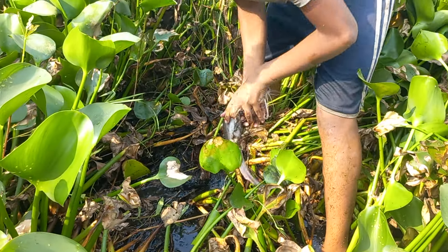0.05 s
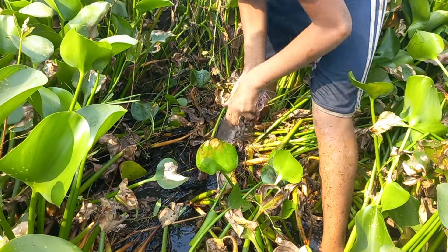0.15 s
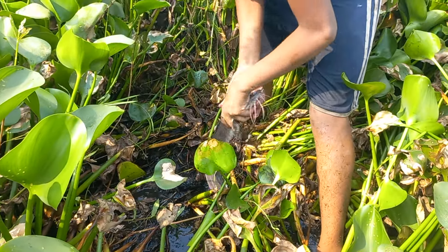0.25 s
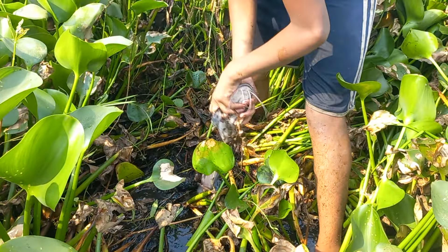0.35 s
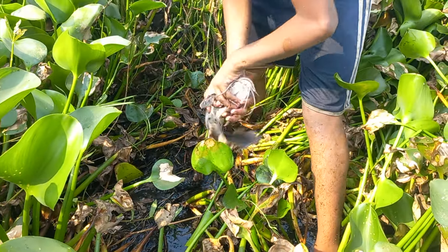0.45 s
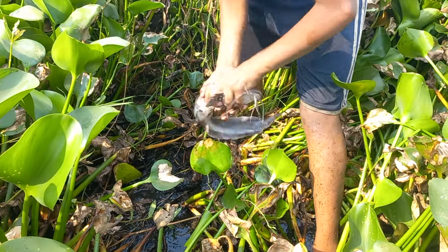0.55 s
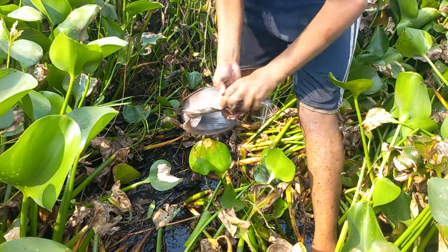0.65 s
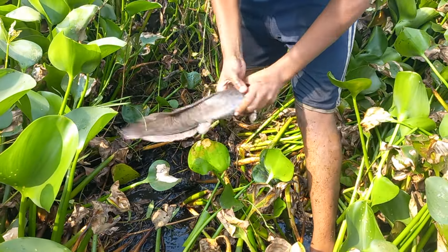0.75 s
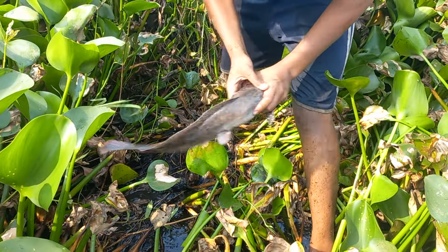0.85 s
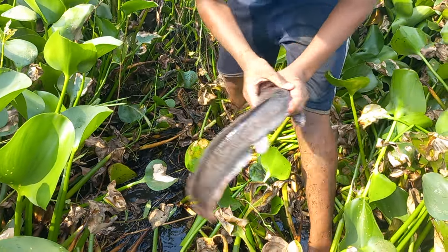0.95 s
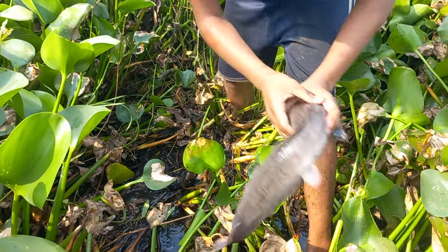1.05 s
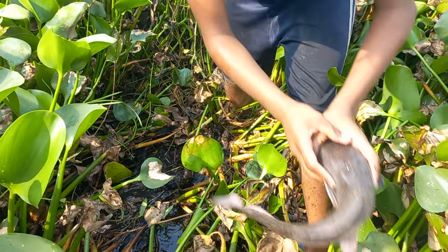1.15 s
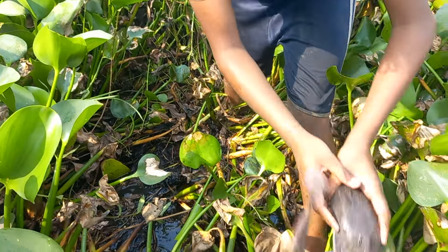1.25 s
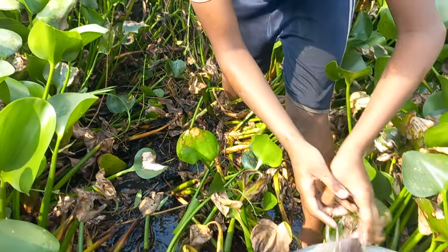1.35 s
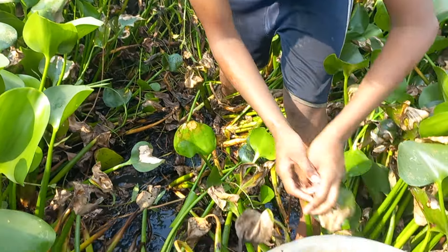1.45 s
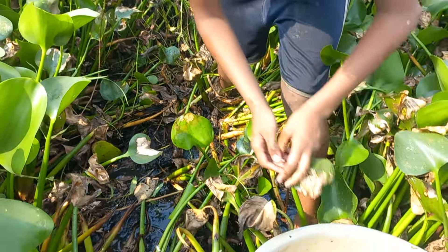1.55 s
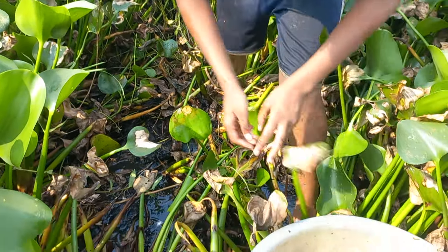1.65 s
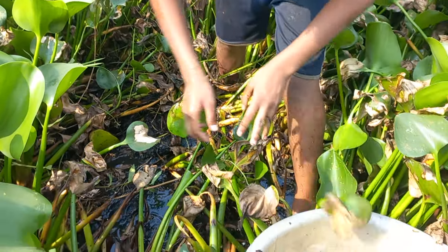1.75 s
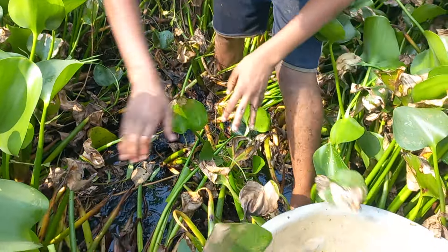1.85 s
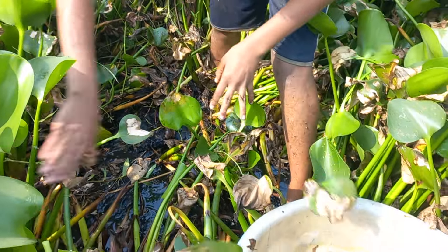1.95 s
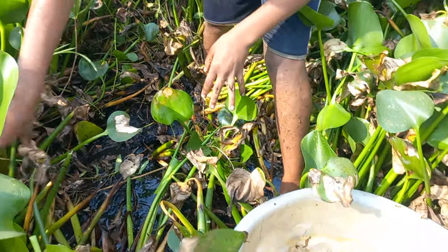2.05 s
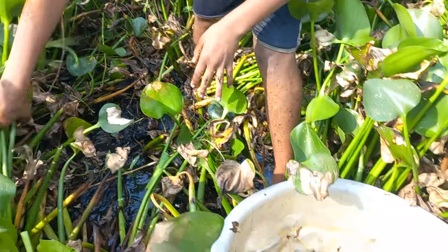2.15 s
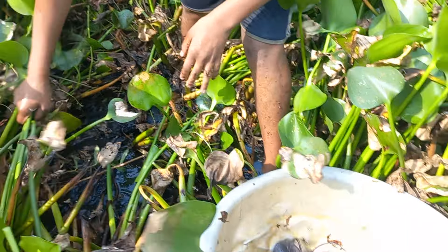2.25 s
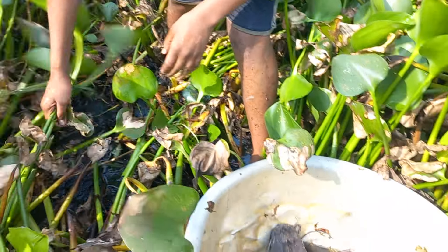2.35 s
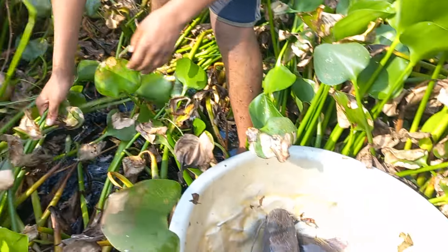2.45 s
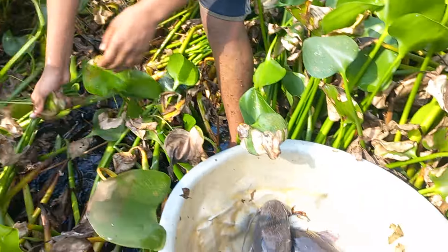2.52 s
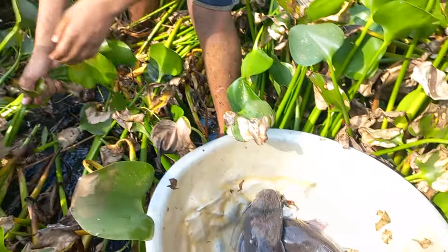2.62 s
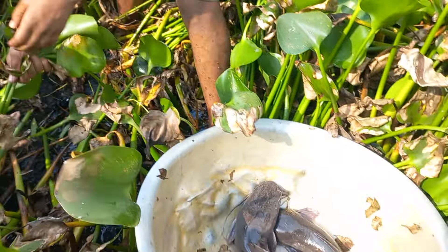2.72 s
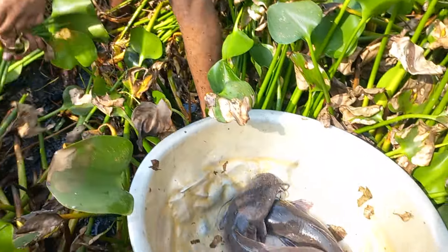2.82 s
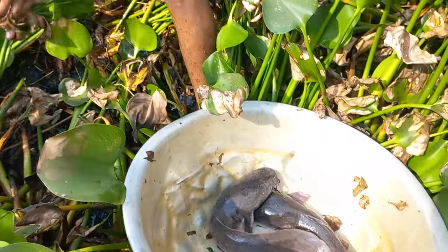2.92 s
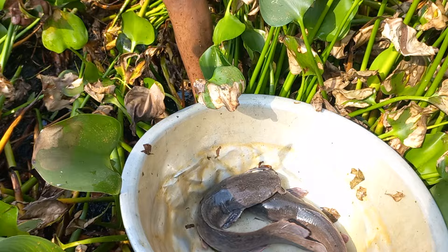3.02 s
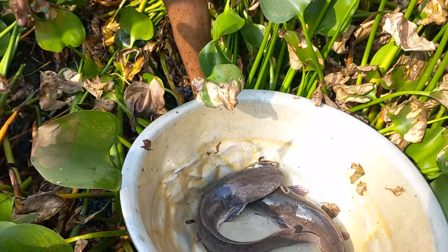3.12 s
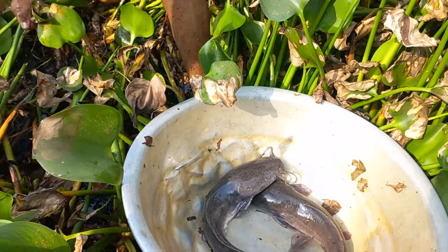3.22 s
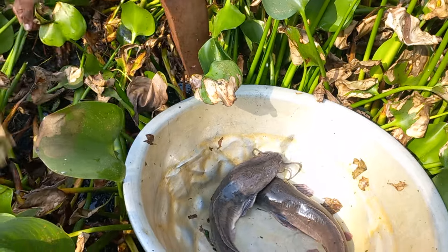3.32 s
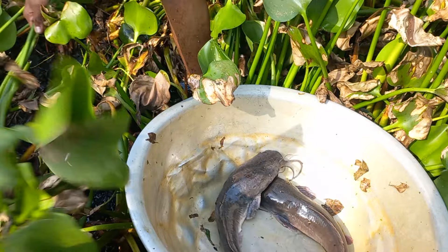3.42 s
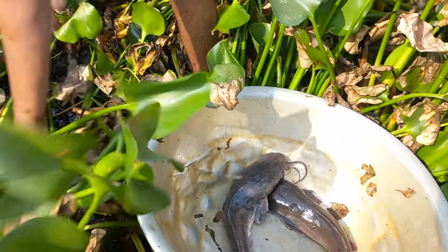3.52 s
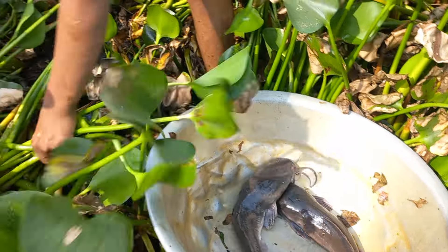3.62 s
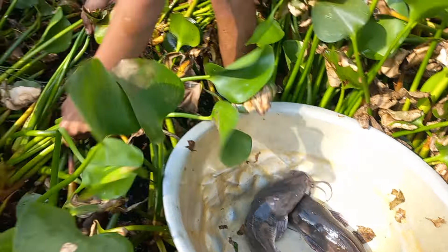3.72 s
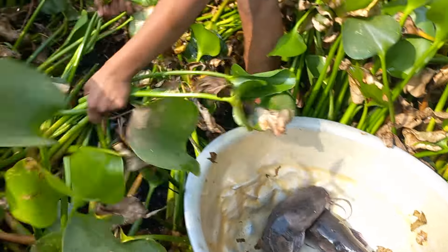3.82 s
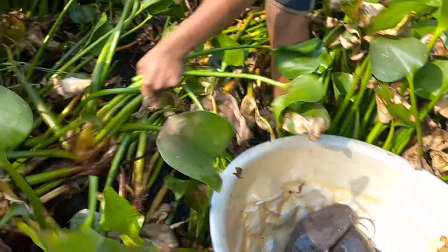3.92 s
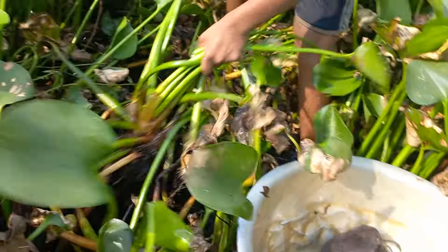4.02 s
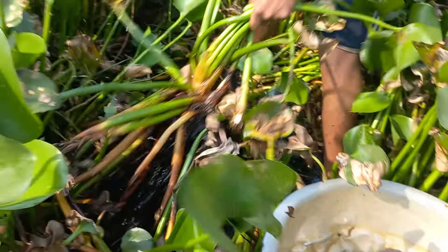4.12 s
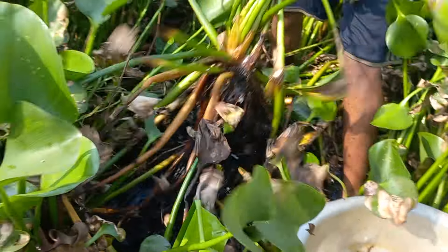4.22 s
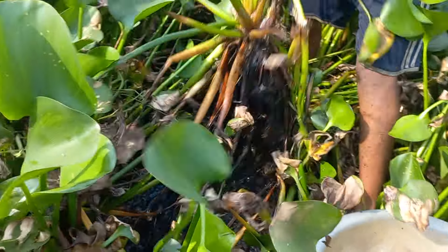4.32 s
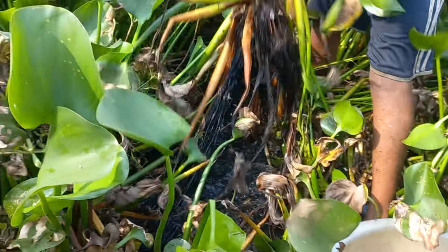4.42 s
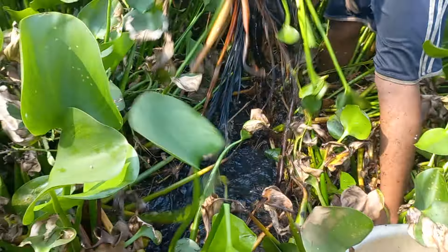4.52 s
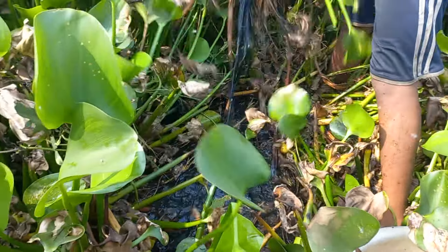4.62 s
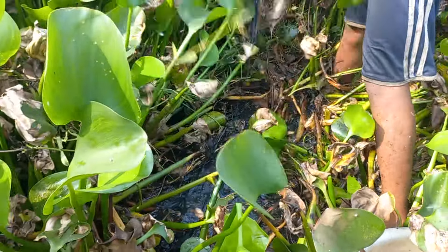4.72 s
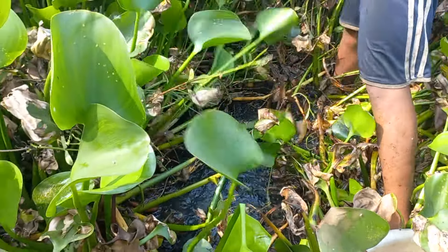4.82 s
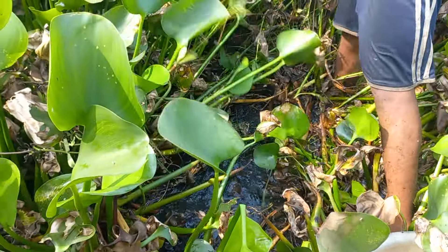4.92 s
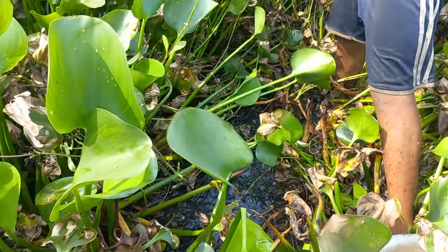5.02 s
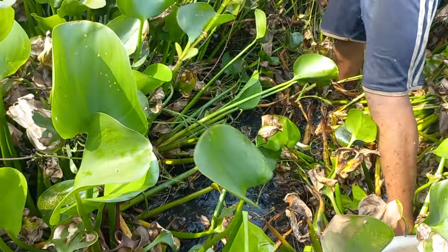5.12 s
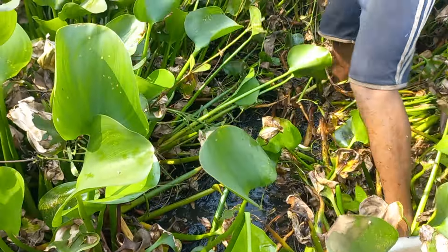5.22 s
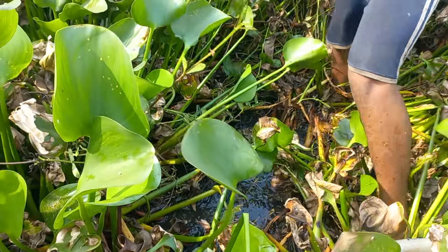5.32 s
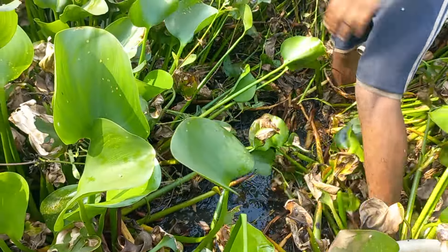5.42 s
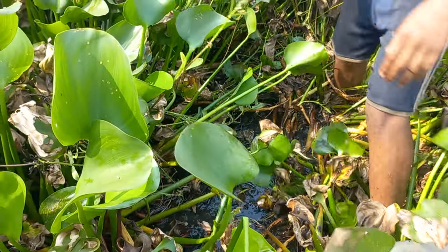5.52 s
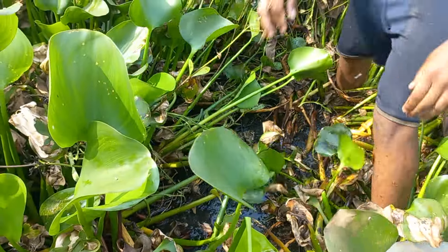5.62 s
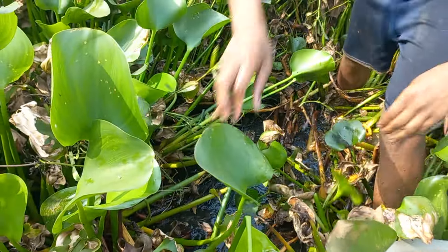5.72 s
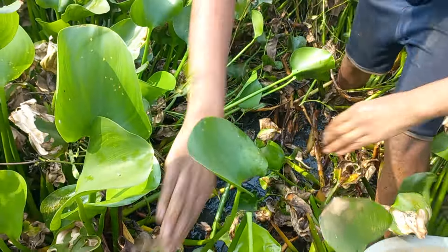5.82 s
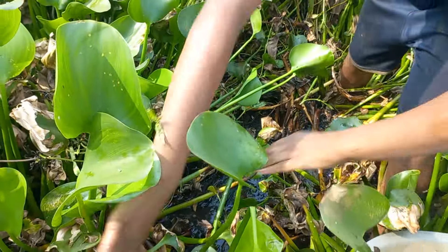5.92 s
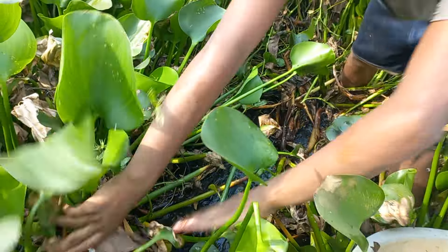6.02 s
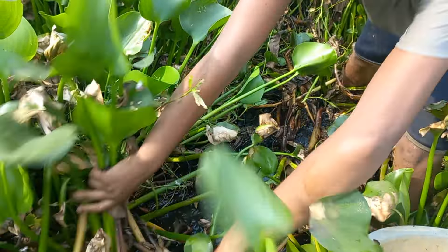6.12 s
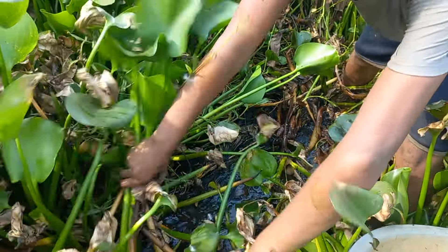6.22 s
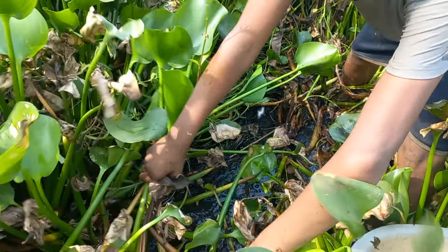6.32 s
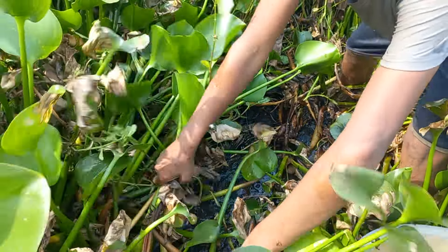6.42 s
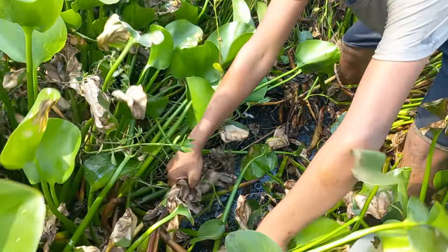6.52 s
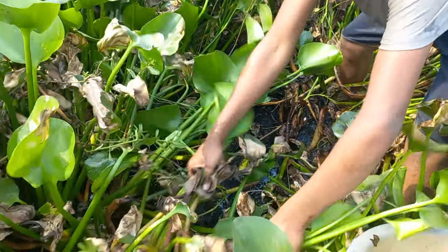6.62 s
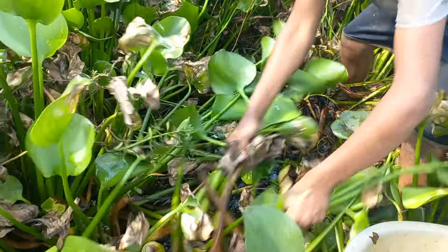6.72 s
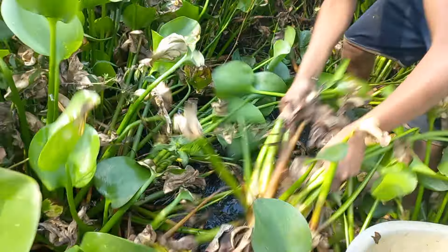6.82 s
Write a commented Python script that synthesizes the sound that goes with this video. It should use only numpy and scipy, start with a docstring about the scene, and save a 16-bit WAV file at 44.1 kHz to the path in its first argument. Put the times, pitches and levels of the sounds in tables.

```python
"""Wet plant stems rustle, crackle and snap as hands pull them out of shallow water.
Water trickles off the roots, bubbles pop, and a flapping fish drops into a thin basin,
setting it ringing and clattering. Birds twitter, pipe and call nearby, and far away a slow
single-cylinder engine thumps through its exhaust. Gusts buffet mainly the left microphone port."""
import sys
import numpy as np
from scipy import signal
from scipy.io import wavfile

SR = 44100
rng = np.random.default_rng(int(sys.argv[2]) if len(sys.argv) > 2 else 0)


def int16_out(signal):
    """Quantize to a 16-bit WAV file."""
    q = np.round(np.clip(np.atleast_2d(signal).T, -1, 1) * 32767)
    wavfile.write(sys.argv[1], SR, q.astype(np.int16))


N = 302614

# Handling the plants. Each row: time in seconds, then rustle, crisp band and wet low band levels in dB.
RUSTLE = [(0.0, -43, -62, -48), (0.19, -45.5, -69, -49.5), (0.67, -47, -66, -51), (1.2, -44, -67, -45.5),
          (1.45, -37.5, -49, -49), (1.57, -57, -67, -50), (1.7, -45, -67, -46.5), (1.83, -54, -72, -55.5),
          (2.06, -46, -62, -49.5), (2.27, -37, -54.5, -51), (2.41, -43, -56, -50.5),
          (2.56, -43.5, -60, -50.5), (2.75, -44.5, -53, -54), (2.94, -37, -42, -47),
          (3.15, -43, -56.5, -47), (3.36, -38.5, -49.5, -42.5), (3.44, -27.5, -33.5, -36),
          (3.57, -31, -34, -40), (4.11, -27.5, -33.5, -36.5), (4.7, -33.5, -40, -44.5),
          (4.99, -38.5, -47, -46.5), (5.31, -36, -46.5, -43), (5.66, -41.5, -52, -50),
          (5.96, -37.5, -46, -42.5), (6.27, -27.5, -31.5, -36.5), (6.51, -33, -40.5, -41),
          (6.69, -30.5, -35, -42.5), (6.86, -21.5, -28, -27.5)]
# Tone of the crackling stems. Each row: frequency in Hz, relative level per Hz in dB.
STEM_TONE = [(170, -3.5), (360, -4.5), (600, -6.5), (900, -7.5), (1470, -5), (1800, -5), (3100, -7.5),
             (4200, -7), (6000, -9.5), (7600, -15), (9500, -16), (12000, -14.5), (15000, -11.5)]
# Clear snaps. Each row: time in seconds, level in dB, strongest pitch in Hz, relative crisp part in dB,
# left over right in dB, 60 dB decay time in seconds, relative low part in dB.
SNAPS = [(0.135, -21.5, 2310, -14, 0, 0.039, -32), (0.1575, -14.5, 3800, -29, 1, 0.07, -38),
         (0.3476, -25, 2500, -20, -1.0, 0.042, -26), (0.387, -18, 3470, -17, -1.0, 0.045, -31),
         (0.6075, -28, 2900, -22, 2, 0.045, -16), (0.6305, -23, 4200, -23, 11, 0.045, -29),
         (0.8699, -10.5, 5400, -17, 10, 0.058, -45), (0.8745, -7, 4390, -27, -6, 0.041, -44),
         (1.3402, -24.5, 1400, -32, -3, 0.033, -9), (1.373, -20.5, 5580, -16, 5, 0.041, -26),
         (1.4006, -20.5, 1900, -20, -1, 0.045, -12), (1.419, -8.5, 1440, -1, 0.5, 0.045, -12),
         (1.4666, -1, 1410, -17, -2, 0.076, -29), (1.5144, 1, 1480, -15, 2, 0.028, -22.5),
         (1.5354, -3, 1760, -28, -2, 0.036, -30), (1.5773, -3, 1550, -23, 1, 0.045, -41),
         (1.7626, -32, 1410, -32, 0.0, 0.049, -6), (2.167, -17.5, 2140, -36, -1, 0.14, -18.5),
         (2.2044, -13.5, 2160, -31, -3, 0.036, -26), (2.3992, -14, 3620, -16.5, -2.5, 0.068, -31),
         (2.4238, -16.5, 2450, -16, 3, 0.039, -36), (2.492, -20, 2330, -24, -1.5, 0.072, -18.5),
         (2.5292, -20, 2580, -24, -8, 0.036, -34), (2.7147, -30, 2360, -15, -1.0, 0.045, -23),
         (2.7347, -27, 5890, -18, 0.5, 0.045, -16), (2.7726, -19.5, 3850, -1, 12, 0.053, -19),
         (2.797, -22.5, 2640, -9, 3, 0.11, -21), (2.8422, -15, 2540, -22, 2, 0.072, -34),
         (2.8868, -19.5, 2380, -13, -2, 0.072, -22), (2.965, -18, 2380, -21, -7, 0.032, -25),
         (3.1155, -14, 4580, -24, 0, 0.11, -23), (3.1786, -21, 2370, -19, -1.5, 0.038, -13.5),
         (3.3029, -27.5, 2420, -21, -9, 0.045, -9), (3.3907, -14, 2090, -17, 0.5, 0.082, -10),
         (3.4266, -23, 5060, -21, 0, 0.041, -22), (3.4545, -13, 2430, -15, 4, 0.045, -22),
         (3.5415, -12.5, 4580, -11, 0.0, 0.14, -15), (3.5604, -13, 2280, -13, -2, 0.14, -16.5),
         (3.6105, -11, 2110, -12, 4, 0.049, -19), (3.637, -12.5, 1420, -17, 0.5, 0.049, -14),
         (3.6561, -10.5, 1920, -24, 1.0, 0.056, -8.5), (3.707, -8.5, 2050, -14, -2.5, 0.11, -16.5),
         (3.8625, -6.5, 5940, -22, -14, 0.037, -30), (3.908, -11, 2410, -6, -3, 0.05, -22),
         (3.9305, -4.5, 1810, -9, 4, 0.045, -24), (3.9834, -8.5, 4650, -20, -6, 0.045, -19),
         (4.0215, -2.5, 3400, -10.5, 1, 0.061, -19), (4.3049, -8.5, 3900, -8, -3.5, 0.035, -21.5),
         (4.4553, -25.5, 1610, 6.5, 1.0, 0.042, -26), (4.604, -22, 5820, -5.5, 6, 0.11, -31),
         (4.7264, -19, 1490, -11, 0, 0.13, -14.5), (4.7496, -17.5, 2270, -1, -1, 0.1, -16),
         (4.8289, -17, 2060, -18, -3, 0.031, -26), (4.8628, -15.5, 4220, -21, -3, 0.043, -23),
         (4.8888, -21, 2070, -22, 0.5, 0.038, -25), (4.9385, -16.5, 1580, -9.5, -0.5, 0.027, -23),
         (5.2078, -17, 1350, -16, 1, 0.041, -19), (5.2787, -15.5, 3180, -15, 1, 0.093, -21),
         (5.303, -17, 3240, -23, -7, 0.045, -26), (5.3693, -23.5, 1240, -30, -1, 0.068, -2.5),
         (5.3991, -16, 1270, -22, 1.5, 0.096, -19), (5.4185, -12.5, 1320, -13, 0, 0.058, -21),
         (5.4373, -11.5, 6860, -20, 0, 0.049, -21), (5.453, -10.5, 2080, -20, -1, 0.11, -37),
         (5.6378, -22.5, 2070, -16, 2, 0.054, -20), (5.844, -22, 1700, -8.5, -6, 0.041, -25),
         (6.0926, -21, 2870, -5, 2, 0.045, -26), (6.134, -15, 1950, -11, 1.0, 0.058, -24),
         (6.1567, -12, 2200, -13, -1.0, 0.13, -19), (6.182, -11, 2090, -15, -2, 0.14, -22),
         (6.2656, -22, 2140, -23, -3, 0.045, 3), (6.2951, -25, 1620, -15, -3, 0.037, -10),
         (6.3145, -20, 5470, -4, -1, 0.045, -14), (6.3493, -14, 4720, -9, -2, 0.12, -25),
         (6.3749, -10.5, 5720, -9, 5, 0.045, -25), (6.4965, -17.5, 1340, -15, 7, 0.045, -13),
         (6.5252, -6, 4450, -9, -2, 0.078, -22.5), (6.6528, -18, 1710, -13, 4, 0.045, -22),
         (6.6776, -3, 2210, -20, 0.0, 0.078, -23), (6.7291, -8.5, 4200, -4, -4, 0.061, -19),
         (6.7471, -1, 1730, -21, -1, 0.12, -22), (6.8006, -7, 4660, -10, 5, 0.027, -27)]
# Wet slaps that swell to a peak. Each row: as for a snap, then swell time in seconds.
SLAPS = [(0.181, -11.5, 4680, -27, -2, 0.069, -31, 0.014), (0.413, -19, 3650, -22, 0, 0.06, -21, 0.028),
         (0.637, -13.5, 3750, -20.5, -2.5, 0.066, -31, 0.0091),
         (0.877, -11, 4350, -23, -2, .064, -45, 0.02), (1.433, -1, 5130, -23.5, 0, 0.11, -25, 0.0066),
         (1.54, -18, 4630, -18.5, 3, 0.25, -26, 0.032), (2.529, -6, 3030, -21.5, 1, 0.038, -34, 0.0026),
         (3.862, -11, 6800, -7, 4.5, 0.079, -39, 0.0061), (3.95, -10.5, 3450, -11, -5, 0.11, -23, .01),
         (3.989, -9.5, 2250, -11, 7, 0.041, -34, 0.015), (5.448, -15, 2040, -1.2, 5, 0.034, -23, 0.0076),
         (6.69, -8, 1823, -28, 0, 0.087, -20, 0.02), (6.766, -6, 5250, -7, 1, .087, -27, 0.018)]
# Stereo width of the plants. Each row: frequency in Hz, share of power heard alike by both ports.
LIKENESS = [(200, 0.97), (600, 0.76), (1500, 0.39), (4000, 0.058), (12000, 0.13)]
# Path difference from the plants. Each row: time in seconds, lag of the left port in samples.
LEFT_LAG = [(0, -15), (1, -13.5), (1.5, 6.5), (2.5, -15.5), (3.2, -19.5), (4, -8.5), (5.3, 4.5),
            (6.1, -32.5), (6.86, 5)]
# Wind on the left port. Each row: time in seconds, level in dB.
WIND = [(0, -42), (1, -60), (2.6, -64), (3.1, -43), (3.45, -31), (3.75, -44), (3.95, -30), (4.1, -33),
        (4.25, -31), (4.45, -27), (4.65, -49), (5.2, -44), (5.5, -44), (5.6, -33.5), (5.85, -38),
        (6.2, -37.5), (6.86, -47)]
# Eddies thumping the left port. Each row: start in seconds, level in dB.
EDDIES = [(0.68, -27), (0.913, -20.5), (3.335, -34), (3.418, -27), (3.863, -10.5), (3.953, -14),
          (3.978, -5.5), (4.182, -7), (4.219, -8), (4.267, -5), (4.332, -8), (4.387, -9.5), (4.418, -9),
          (4.465, -13.5), (4.587, -12.5), (4.81, -19.5), (5.546, -16), (5.723, -18.5), (5.8, -20),
          (6.168, -17), (6.691, -17)]
# The far engine. Each row: time in seconds, level in dB.
ENGINE = [(0, -40), (1.2, -39.5), (1.7, -41.5), (2.2, -46.5), (3, -39), (4.5, -44), (6.86, -36.5)]
# Exhaust resonances. Each row: pitch in Hz, nominal width in Hz, relative level in dB.
EXHAUST_MODES = [(83.4, 35, -0.5), (102.5, 19, -3), (134, 29, -3)]
# Stray bird notes. Each row: start in seconds, first and last pitch in Hz, seconds held, level in dB.
TWITTER = [(0.038, 3090, 2880, 0.055, -43), (0.272, 3210, 3200, 0.022, -41), (.385, 3200, 3120, 0.028, -42),
           (0.507, 3420, 3600, .036, -46), (0.53, 3520, 5370, 0.074, -38.5),
           (0.669, 3590, 3420, 0.036, -40), (0.708, 3950, 3400, 0.023, -41),
           (0.803, 4500, 4100, 0.026, -39), (0.91, 3740, 4860, 0.053, -43), (0.94, 3880, 3400, .063, -41),
           (1.024, 3620, 3380, .015, -40), (1.174, 3660, 3660, 0.028, -38),
           (1.196, 3730, 3400, 0.018, -36.5), (1.262, 3530, 4300, 0.091, -41.5),
           (1.986, 2030, 2020, 0.041, -41.5), (3.191, 2024, 2030, .038, -34),
           (3.757, 4300, 3920, 0.022, -22), (4.36, 4380, 3700, 0.095, -32), (4.625, 4350, 3740, .03, -26.5)]
# One bird repeating a falling call. Each row: start in seconds, level in dB.
CALLS = [(1.89, -46), (2.185, -49), (2.502, -42.5), (2.801, -39.5), (3.098, -34), (3.419, -32.5),
         (3.733, -36), (4.681, -36.5), (4.991, -39)]
# The contour of that call. Each row: seconds into the call, pitch in Hz, relative level in dB.
CALL_SHAPE = [(0, 5297, 0.5), (.014, 5100, 11.5), (0.024, 3977, 10.5), (.032, 3184, -2), (.05, 2550, 4),
              (.068, 3140, -7)]
# Single bubbles. Each row: start in seconds, first pitch in Hz, length in seconds, level in dB.
BUBBLES = [(0.478, 990, 0.031, -39.5), (2.626, 1250, 0.01, -33), (2.797, 600, 0.0023, -29),
           (2.889, 800, 0.0084, -33), (3.104, 586, 0.039, -35.5), (3.176, 2070, .01, -33),
           (5.39, 440, 0.0091, -32), (5.414, 1245, 0.04, -28), (5.45, 1680, 0.0079, -13.5),
           (5.594, 450, .012, -34), (5.669, 940, 0.013, -34), (5.875, 880, .04, -38),
           (6.215, 1070, 0.0057, -17), (6.261, 2040, 0.015, -19.5)]
# Water trickling off the roots. Each row: time in seconds, level in dB.
TRICKLE = [(0, -54), (1.9, -54), (2.27, -27.5), (2.6, -55), (2.98, -26), (3.4, -46), (4.09, -19),
           (4.5, -48), (5.0, -44), (5.71, -29.5), (6.25, -27.5), (6.86, -19)]
# The fish hitting the basin. Each row: start in seconds, level in dB, low mode boost in dB,
# contact time in seconds, thud pitch in Hz, thud level in dB.
FISH_BLOWS = [(1.416, -17.5, -7, 0.01, 197, -8.5), (1.434, -39, -13, .004, 142, -11.5),
              (1.451, -34, 9, 0.0036, 252, -4.5), (1.465, -11.5, -9, 0.0024, 200, -26),
              (1.51, -33.5, 11.5, 0.0045, 186, -7.5), (1.54, -24.5, -7, 0.0049, 200, -39),
              (1.577, -12.5, -15, 0.0079, 250, -44), (1.632, -37.5, 7.5, 0.0054, 268, -18),
              (1.765, -37, 8, 0.0026, 200, -44), (3.659, -27.5, 9, 0.011, 390, -21),
              (3.699, -39, 10, 0.0015, 295, -19), (6.275, -37, 18, 0.009, 380, -20)]
# Modes of the basin. Each row: pitch in Hz, relative level in dB, 60 dB decay time in seconds.
BASIN_MODES = [(360, -8.5, 0.5), (634, -14, 0.12), (666, -5, 0.15), (810, -6, 0.13), (910, -3.5, 0.14),
               (1060, -15.5, 0.56), (1343, -1, 0.27), (1320, -30, 0.2), (1440, -10, 0.29),
               (1849, -2.5, 0.24), (1900, -25, .1), (1915, -8, 0.13)]

CRISP_FROM_HZ, FINE_FROM_HZ = 4490, 8700   # the crisp band, and the fine treble above it


def amp(db):
    """Decibels to gain."""
    return np.exp(np.asarray(db) * np.log(10) / 20)


def rms_one(x):
    """Scale to rms 1."""
    return x / np.sqrt(np.mean(x ** 2) + 1e-20)


def in_time(rows):
    """Columns of an automation table, one value per sample."""
    s, *columns = np.transpose(rows)
    return [np.interp(np.arange(N) / SR, s, c) for c in columns]


def at_hz(points, hz):
    """Read a spectrum table on a log axis."""
    freqs, values = np.transpose(points)
    return np.interp(np.log(hz), np.log(freqs), values)


def bandpass(x, order, edges_hz):
    """Butterworth band filter."""
    return signal.sosfilt(signal.butter(order, edges_hz, "band", fs=SR, output="sos"), x)


def drift(hz):
    """Slow random modulation with spread 1."""
    r = np.exp(-80 * np.pi * hz / SR)
    slow = signal.lfilter([1], [1, -2 * r, r * r], rng.standard_normal(N // 40 + 2002))[2000:]
    return np.interp(np.arange(N) / 40, np.arange(len(slow)), rms_one(slow))


def resonate(x, hz, t60):
    """A unit click sets a sine of height 1 ringing."""
    r, w = amp(-60 / (t60 * SR)), 2 * np.pi * hz / SR
    return signal.lfilter([0, np.sin(w)], [1, -2 * r * np.cos(w), r * r], x + 1e-18)


def glide(start_hz, end_hz, length, attack):
    """A sliding sine that fades in and out; attack is a share of its length."""
    u = np.arange(round(length * SR)) / (length * SR)
    phase = 2 * np.pi * np.cumsum(start_hz + (end_hz - start_hz) * u) / SR
    return np.sin(phase) * np.minimum(u / attack, 1) * np.minimum(2 * (1 - u) / (1 - attack), 1)


def add(out, s, sound):
    """Mix a short sound in at time s."""
    i = max(round(s * SR), 0)
    out[..., i:i + sound.shape[-1]] += sound[..., :N - i]


def pan_power(side_db):
    """Left and right power gains, side_db apart."""
    return amp([side_db, -side_db])


def crackle(per_s, spread_db, t60):
    """Power envelope of countless tiny breaks: sudden starts of uneven size, quick decay; mean 1."""
    kicks = (rng.random(N) < per_s / SR) * amp(2 * spread_db * np.minimum(rng.exponential(1, N), 4))
    power = signal.lfilter([1], [1, -amp(-120 / (t60 * SR))], kicks + 1e-18)
    return power / power.mean()


def plants():
    """Handled stems: narrow noise bands opened by the rustle, its crackle, the snaps and the slaps."""
    level_db, crisp_db, wet_db = in_time(RUSTLE)
    fine_db = -42 + 0.8 * (level_db + 33) + 0.18 * (crisp_db + 46)   # rides on rustle and crisp band
    wander = pan_power(drift(8))
    busy = np.clip((level_db + 73.5) / 18, .1, 1)   # harder pulling crackles more
    broad, *regional = [crackle(120 * amp(2.8 * drift(5.7)), spread_db=4.5, t60=0.023) for _ in range(5)]
    inner = crackle(500, spread_db=5, t60=0.0064)
    breaks = stem_breaks(level_db, crisp_db)
    colours = rng.normal(0, 2.2, (len(breaks), 20))   # every break sounds a little different
    white = rng.standard_normal((2, 3, N))
    lagged = np.clip(np.arange(N) + np.round(in_time(LEFT_LAG)[0]).astype(int), 0, N - 1)
    edges = FINE_FROM_HZ * 2 ** (np.arange(-16, 4) * .35)
    mids_db = 10 * np.log10(np.sum(amp(2 * at_hz(STEM_TONE, np.arange(1200, 5500, 10)))) * 10)
    out = np.zeros((2, N))
    for k, (low, high) in enumerate(zip(edges, edges[1:])):
        hz = np.sqrt(low * high)
        tone_db = at_hz(STEM_TONE, hz) - mids_db
        # how far this band belongs to the wet lows, the fine treble and the crisp band
        wet = np.clip(np.log2(1400 / hz), 0, 1)
        fine = float(hz > FINE_FROM_HZ)
        crisp = np.clip(np.log2(hz / CRISP_FROM_HZ) / 0.58, 0, 1) * (1 - fine)
        rustle_db = level_db + wet * (wet_db - level_db + 4.5) + crisp * (crisp_db - level_db + 8.5)
        rustle_db += fine * (fine_db - level_db)
        grains = 1 + 0.24 * busy * (0.48 * broad + 0.82 * regional[k // 5] - 1)
        rustle = amp(2 * (tone_db + rustle_db + 2.03 * drift(16.5))) * grains
        hits = np.zeros((2, N))
        for (db, top_hz, crisp_rel_db, low_rel_db, start, shape), colour_db in zip(breaks, colours):
            bump_db = 10 * np.exp(-(np.log2(hz / top_hz) / 0.29) ** 2)
            eq_db = wet * (low_rel_db + 18) + crisp * (crisp_rel_db + 15)
            eq_db += fine * (1.07 * (crisp_rel_db + 14) - 7.5)
            add(hits, start, amp(2 * (tone_db + db - 12 + bump_db + eq_db + colour_db[k])) * shape)
        directional = hz > 1000   # up here the path difference between the ports matters
        power = rustle * (wander if directional else 1) + hits * (0.51 + 0.19 * inner)
        both, left, right = white[k % 2]
        shared = np.array([both, both[lagged] if directional else both])
        alike = at_hz(LIKENESS, hz)
        noise = np.sqrt(alike) * shared + np.sqrt(1 - alike) * np.array([left, right])
        order = 8 if 7000 < hz < FINE_FROM_HZ else 3   # the crisp band ends sharply
        out += bandpass(noise * np.sqrt(power * SR / 2), order, [low, high])
    return out


def burst(s, side_db, t60, swell=0.00098, crack_t60=0.0055):
    """Start time and stereo power envelope of one break: swell, sharp crack, decay."""
    t = np.arange(-4 * swell, t60, 1 / SR)
    body = np.exp(np.where(t < 0, 2 * t / swell, -6 * np.log(10) * t / t60))
    crack = (t >= 0) * amp(-120 * np.abs(t) / crack_t60)
    return s + t[0], (body + crack) * pan_power(side_db)[:, None]


def stem_breaks(level_db, crisp_db, small_count=45, small_t60=0.016, small_low_db=-13):
    """Level, tone and envelope of each clear snap, small random snap and wet slap."""
    small = []
    for when, pitch, size, side in rng.random((small_count, 4)):
        i = int(when * N)
        db, hz = level_db[i] + 11.5 - size, 1400 * 4 ** pitch   # pokes out above the rustle
        small.append((i / SR, db, hz, crisp_db[i] - level_db[i], 8 * (side - .5), small_t60, small_low_db))
    return [(db, hz, crisp, low, *burst(s, side_db, t60, *swell))
            for s, db, hz, crisp, side_db, t60, low, *swell in [*SNAPS, *small, *SLAPS]]


def wind():
    """Lumpy low noise, separate in each port; strong gusts reach higher, and single eddies thump."""
    left_db, = in_time(WIND)
    right_db = -45.5 + 0.46 * (left_db + 40)   # the sheltered port swings less
    gust = rng.standard_normal((2, N)) * amp(3 * np.array([drift(15), drift(15)]))
    body = rms_one(bandpass(gust, 3, [66, 130]))
    edge = rms_one(bandpass(gust, 2, [130, 240])) * amp(.5 * left_db + 7)
    thumps, t = np.zeros(N), np.arange(SR // 10) / SR
    for s, db in EDDIES:
        cycles = t * (102.6 + 2.5 * (db + 17))   # harder eddies are quicker
        thump = cycles * np.exp(-1.3 * cycles) * np.sin(2 * np.pi * cycles * (1.15 - 0.12 * cycles))
        add(thumps, s, amp(db + 10.5) * thump * rng.choice([-1, 1]))
    return amp([left_db + 6.5, right_db + 6.5]) * (body + edge) + thumps * amp([[0], [-18]])


def engine(firings_per_s=13.13):
    """One uneven puff per firing rings the exhaust pipe."""
    level_db, = in_time(ENGINE)
    cycle = (np.arange(N) * firings_per_s / SR + 0.147) % 1
    firing = np.diff(cycle, prepend=0) < 0
    puffs = np.exp(-cycle / 0.23) * (0.48 * rng.standard_normal(N) + 60 * firing)
    puffs *= amp(2.7 * drift(6.4))   # some firings are weak
    pipe = sum(amp(db) * rms_one(resonate(puffs, hz, 5.2 / width)) for hz, width, db in EXHAUST_MODES)
    return amp(level_db) * rms_one(bandpass(pipe, 6, [58, 172]))


def birds(pipe_count=10, pipe_every_s=0.0822):
    """Twitters, an even run of sinking pips and a falling call, all slightly husky whistles."""
    out = np.zeros(N)
    for s, start_hz, end_hz, length, db in TWITTER:
        add(out, s, amp(db) * glide(start_hz, end_hz, length, attack=0.069))
    for since in pipe_every_s * np.arange(pipe_count):
        hz = 3035 - 397 * since
        add(out, 0.438 + since, amp(-39) * glide(hz, hz - 169, length=0.042, attack=0.039))
    at, hz, shape_db = np.transpose(CALL_SHAPE)
    t = np.arange(0, at[-1], 1 / SR)
    phase = 2 * np.pi * np.cumsum(np.interp(t, at, hz)) / SR
    call = np.sin(phase) * amp(np.interp(t, at, shape_db)) * np.minimum(t * 300, 1)
    for s, db in CALLS:
        add(out, s, amp(db) * call)
    return out * (1 + .5 * drift(120))   # fast flutter adds the husk


def leaf_scatter(song):
    """Near leaves blur each note, far banks give a faint long tail."""
    t = np.arange(SR // 3) / SR
    decay = amp(-25) * np.exp(-t / .008) + amp(-43) * np.exp(-t / .07)
    echoes = rng.standard_normal((2, len(t))) * decay
    direct = .33 * np.array([song, np.roll(song, -12)])
    return direct + signal.fftconvolve(song[None], echoes, axes=1)[:, :N]


def water(trickle_hz=2073, trickle_count=2200):
    """Bubbles ring briefly and rise in pitch; tiny ones trickle at random."""
    out, trickle_db = np.zeros(N), in_time(TRICKLE)[0]
    for s, hz, length, db in BUBBLES:
        rise_hz = 226 + 9700 * length   # longer bubbles climb further
        add(out, s, amp(db) * glide(hz, hz + rise_hz, length, attack=0.04))
    for when, pitch, detune, size in rng.random((trickle_count, 4)):
        hz = trickle_hz * 2 ** (.4 * (pitch + detune - 1))
        db = trickle_db[int(when * N)] - 11 + 8 * size
        add(out, when * N / SR, amp(db) * glide(hz, 1.12 * hz, length=8 / hz, attack=.15))
    return np.array([out, np.roll(out, -6)])


def basin_ring():
    """Each blow is a short noisy contact that drives all modes; heavy soft blows favour the low ones."""
    out, t = np.zeros(N), np.arange(SR // 20) / SR
    touches = rng.standard_normal((len(FISH_BLOWS), len(t)))
    colours = rng.normal(0, 2.4, (len(FISH_BLOWS), len(BASIN_MODES)))
    for k, (hz, mode_db, t60) in enumerate(BASIN_MODES):
        force = np.zeros(N)
        for (s, db, low_db, contact, *_), noise, colour_db in zip(FISH_BLOWS, touches, colours):
            push = noise * np.exp(-t / contact) / np.sqrt(contact * SR)
            add(force, s, amp(db + mode_db + low_db * (hz < 1150) + colour_db[k]) * push)
        out += resonate(force, hz, t60)
    return out


def fish_thuds(decay_cycles=7.6):
    """The fish lands with a dull thud that dies by 60 dB within a few cycles."""
    out, t = np.zeros(N), np.arange(SR // 3) / SR
    for s, *_, hz, db in FISH_BLOWS:
        envelope = amp(db - 60 * t * hz / decay_cycles) * (1 - np.exp(-3 * t * hz))
        add(out, s, envelope * np.sin(2 * np.pi * hz * t))
    return out


def basin_clatter(band_hz=(1330, 2090), t60=0.16):
    """The crowded upper modes blur into a rough band that dies after each blow."""
    envelope, t = np.zeros(N), np.arange(SR // 3) / SR
    for s, db, _, contact, *_ in FISH_BLOWS:
        add(envelope, s, amp(db + 2.5 - 60 * t / t60) * (1 - np.exp(-t / contact)))
    return envelope * rms_one(bandpass(rng.standard_normal((2, N)), 2, band_hz))


def scene():
    """The stereo mix: close handling in front, birds and engine behind, wind on the ports."""
    close = plants() + basin_ring() + fish_thuds() + basin_clatter() + water()
    return close + leaf_scatter(birds()) + engine() + wind()


def record(dry, low_cut_hz=54, high_cut_hz=15900):
    """Cut the bass, round off the peaks, cut the top."""
    bass_cut = signal.sosfilt(signal.butter(4, low_cut_hz, "high", fs=SR, output="sos"), dry)
    rounded = .95 * np.tanh(bass_cut / .95)
    return signal.sosfilt(signal.ellip(10, .5, 75, high_cut_hz, fs=SR, output="sos"), rounded)


dry = scene()
out = record(dry)
int16_out(out)
```